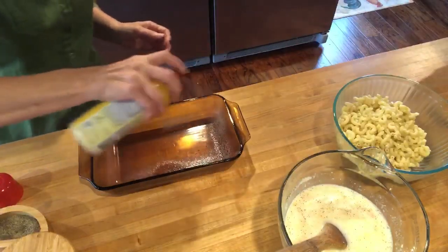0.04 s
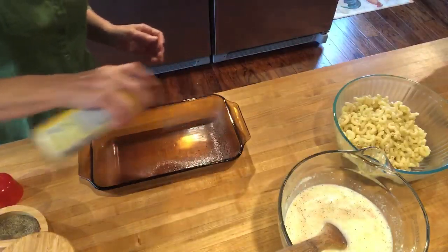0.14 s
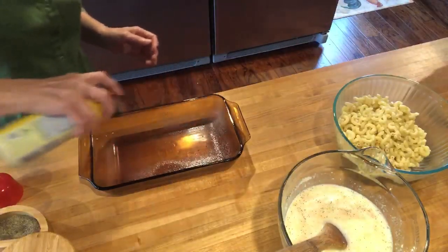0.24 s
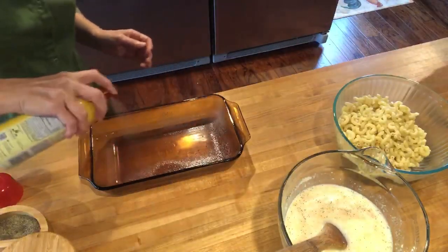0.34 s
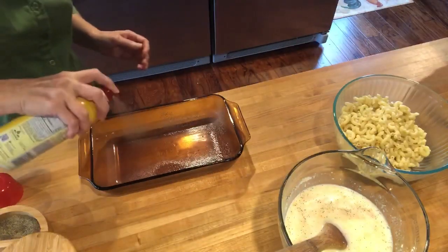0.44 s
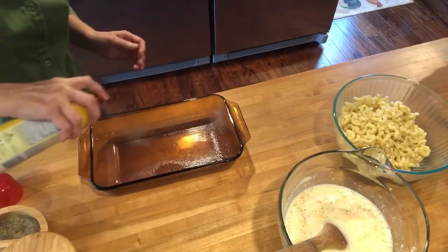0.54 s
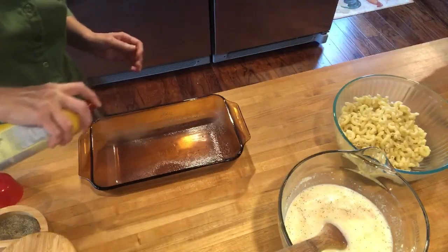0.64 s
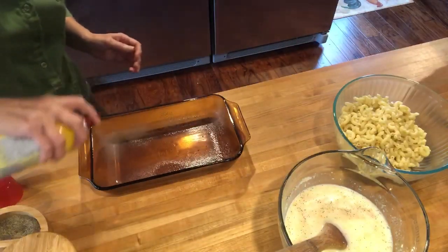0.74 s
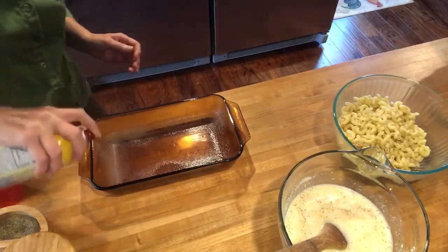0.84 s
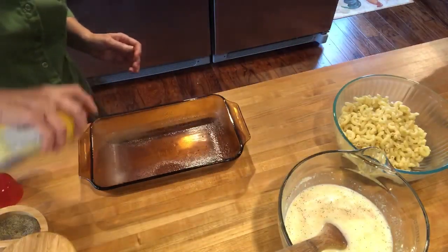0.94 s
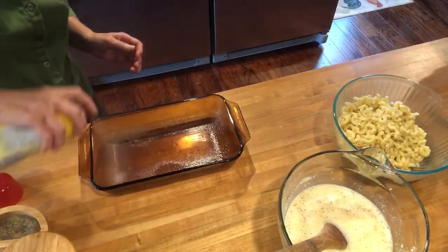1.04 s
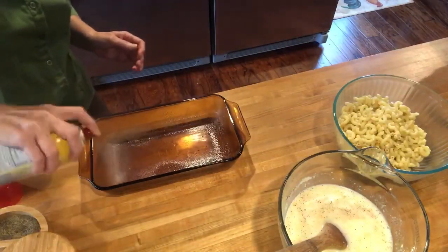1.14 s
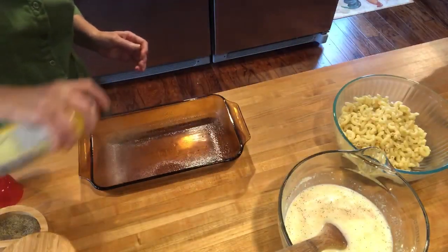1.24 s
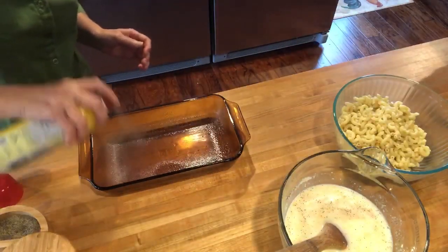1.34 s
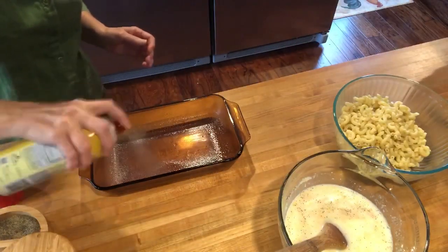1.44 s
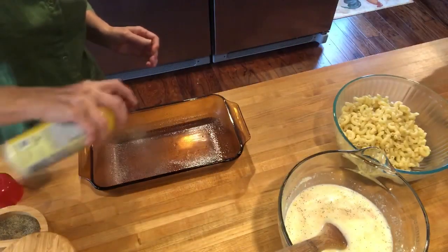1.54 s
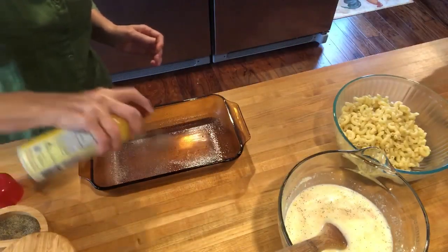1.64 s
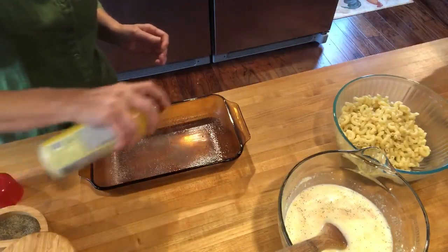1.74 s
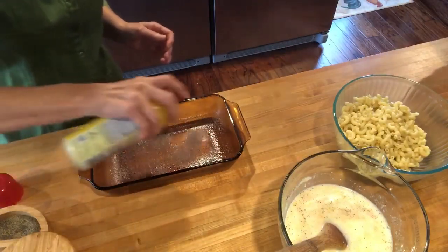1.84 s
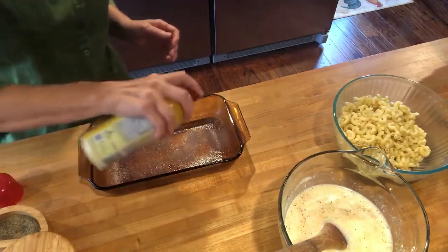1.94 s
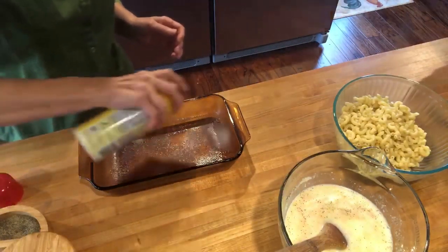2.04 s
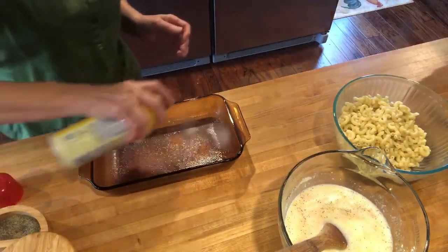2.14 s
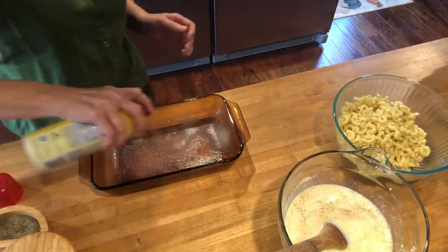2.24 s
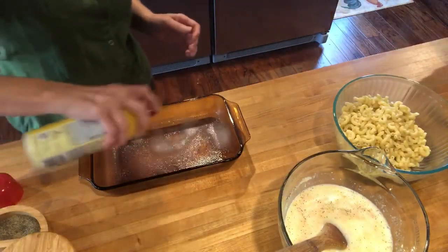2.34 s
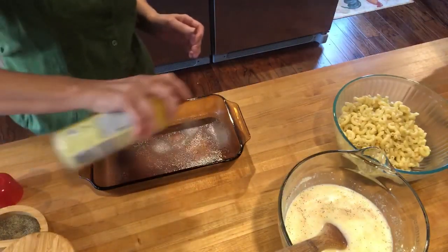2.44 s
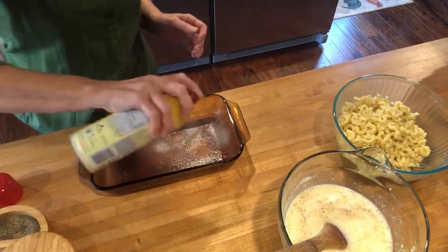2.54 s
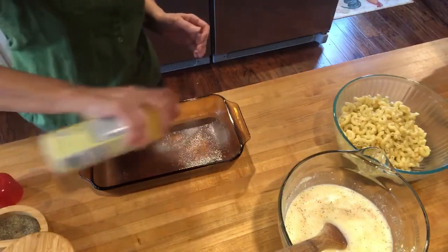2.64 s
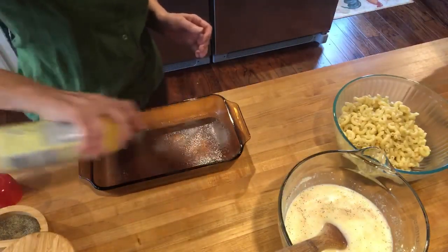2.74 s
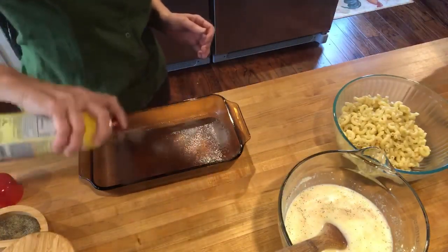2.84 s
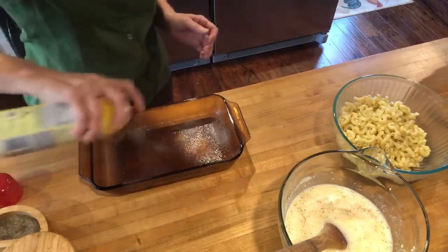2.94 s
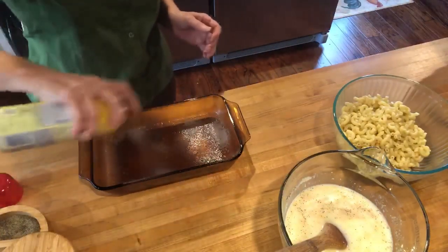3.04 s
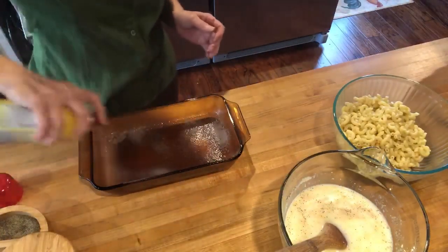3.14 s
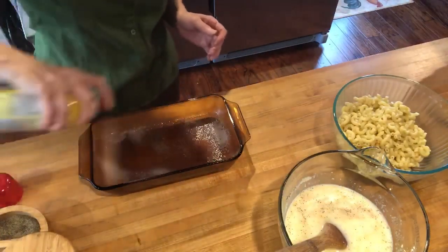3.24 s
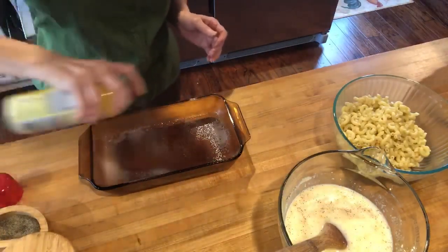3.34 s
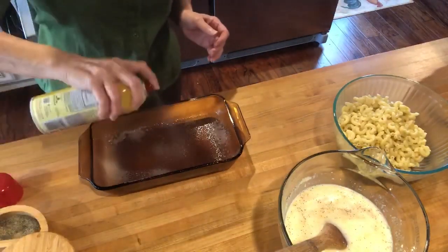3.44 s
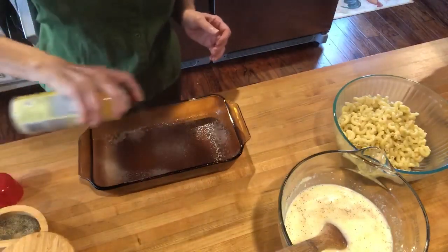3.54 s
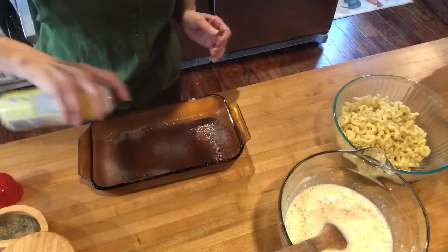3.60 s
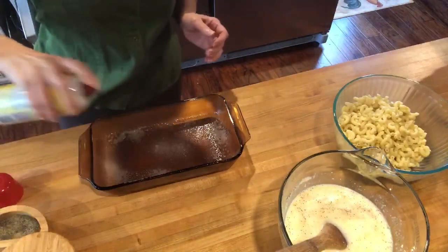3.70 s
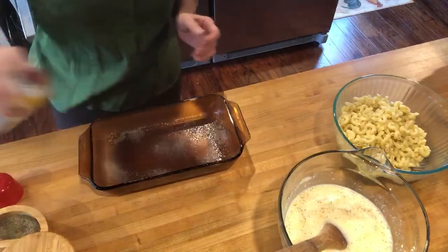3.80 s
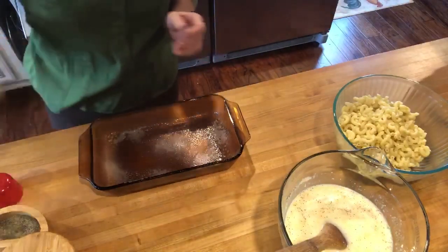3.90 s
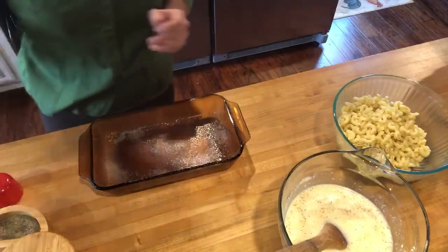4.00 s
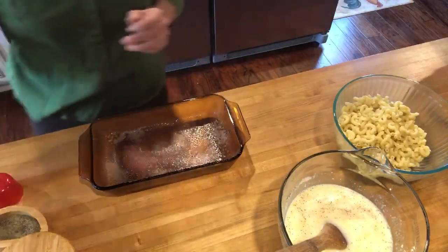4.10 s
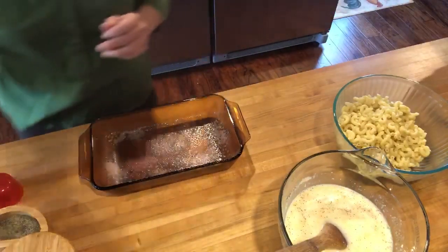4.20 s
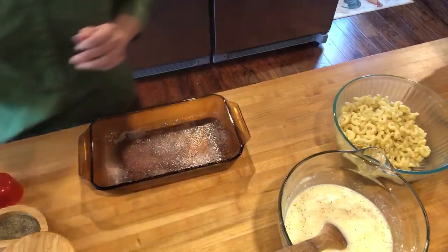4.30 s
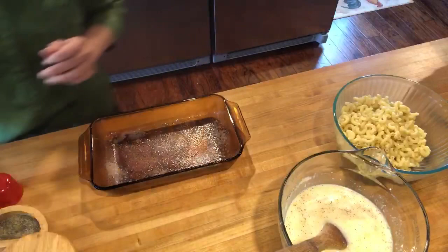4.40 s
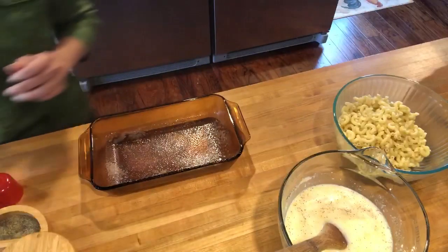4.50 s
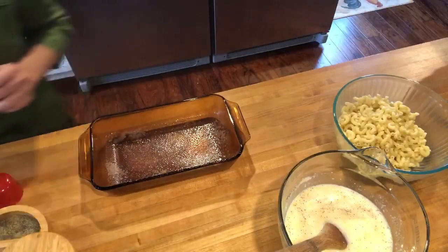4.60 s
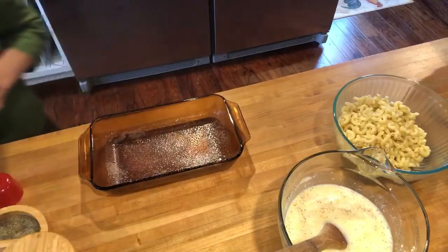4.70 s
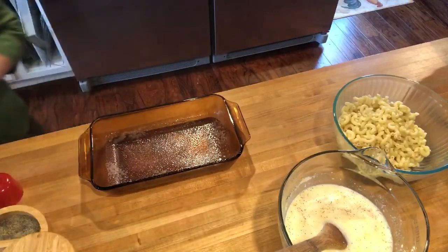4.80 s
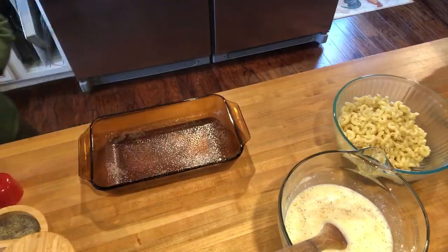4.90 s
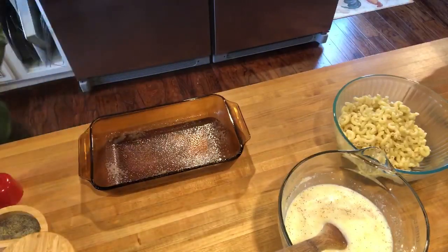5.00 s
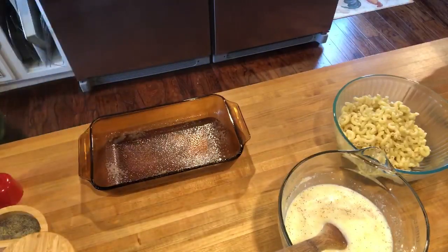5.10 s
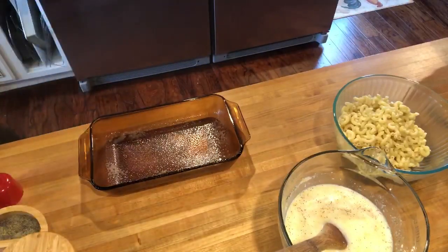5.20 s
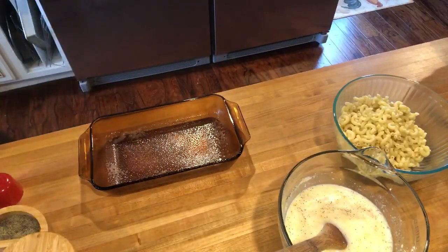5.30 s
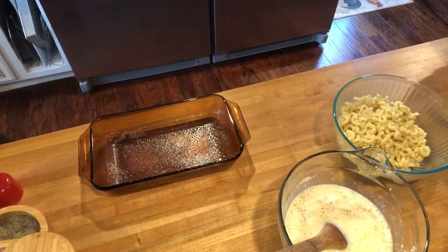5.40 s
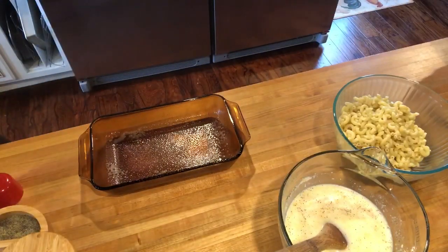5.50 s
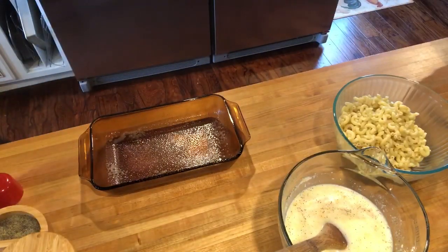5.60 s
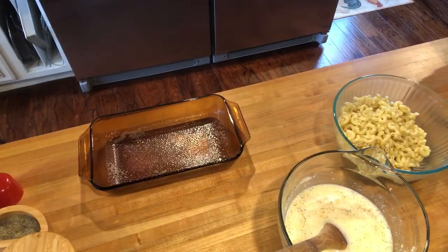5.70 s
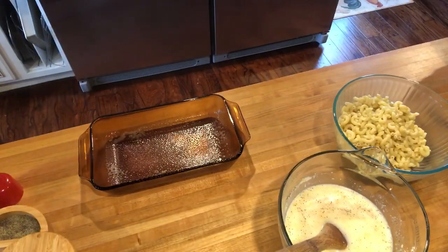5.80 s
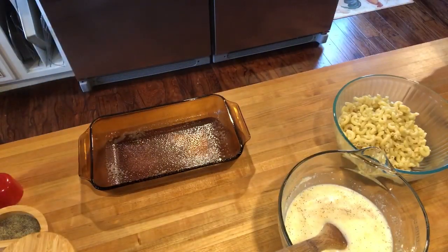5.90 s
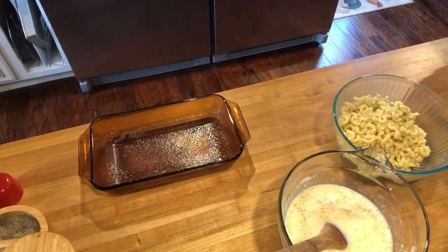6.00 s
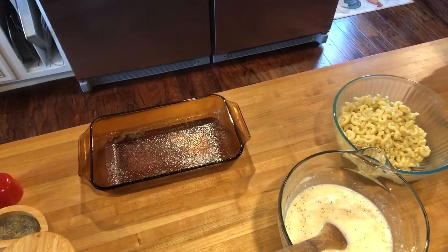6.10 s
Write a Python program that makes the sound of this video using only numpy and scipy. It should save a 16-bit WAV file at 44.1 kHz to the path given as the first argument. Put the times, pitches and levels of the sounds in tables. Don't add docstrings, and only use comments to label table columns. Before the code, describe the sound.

A close, bright aerosol hiss sweeps over a glass dish, snaps off, then a can knocks down on a wooden counter as a refrigerator hums.

```python
import sys
import numpy as np
from scipy import signal
from scipy.io import wavfile
from scipy.ndimage import uniform_filter1d, map_coordinates

SR = 44100
rng = np.random.default_rng(int(sys.argv[2]) if len(sys.argv) > 2 else 0)


def wav_out(sig):
    wavfile.write(sys.argv[1], SR, np.round(np.clip(np.atleast_2d(sig).T, -1, 1) * 32767).astype(np.int16))


def field_ratio(decibels):
    return 10 ** (np.asarray(decibels, dtype=float) / 20)


N = 271215

# t/s, level/dB, nearness to the glass/dB
JET = [(0.0, -40, -2.5), (0.1, -38.5, 0), (0.28, -37.5, -1), (0.55, -38, -0.8), (0.95, -39.5, 0),
       (1.18, -40.5, 0), (1.26, -37.5, 0.5), (1.4, -39.2, 1), (1.72, -39, 1.5), (1.87, -40, -1.2),
       (2.05, -38, -0.2), (2.2, -39, 3), (2.4, -40.5, 2), (2.54, -38, -2), (2.8, -37.5, 2.1),
       (3.12, -38, -1), (3.35, -39.5, 2.7), (3.53, -39.5, 1.2)]
# f/Hz, density/dB
JET_COLOUR = [(300, -25.5), (550, -20.5), (1000, -7.5), (1700, -6.5), (2600, -6.5), (3700, 1), (5500, 1),
              (7000, 1), (8800, 0.5), (12000, -0.5), (16000, 0.5)]
# t/s, extra path by the dish wall/cm, share/1, by the dish floor/cm, share/1
SWEEP = [(0.0, 7.3, .1, 25, .1), (0.22, 9.1, .16, 17.3, .3), (0.36, 8.2, .14, 19.8, .3),
         (0.5, 8.6, .18, 20.2, .22), (0.6, 9.0, .24, 20.2, .12), (0.95, 9.3, .26, 18.4, .14),
         (1.22, 9.6, .2, 21.5, .15), (1.45, 10.4, .13, 22, .16), (1.53, 9, .1, 14.6, .16),
         (1.9, 10, .12, 16.5, .05), (2.04, 9, .08, 12.5, .2), (2.14, 9, .05, 15.5, .26),
         (2.26, 8.8, .06, 14.4, .18), (2.5, 8.8, .32, 26, .22), (2.71, 10.5, .2, 20.9, .32),
         (2.91, 10.6, .14, 25.5, .27), (3.12, 9, .16, 20.3, .2), (3.53, 8.9, .1, 20, .12)]
# t/s, level/dB
GULPS = [(0.0, -3), (0.85, -1), (0.92, -1.5), (1.2, -4), (1.9, 3.5), (1.95, -4), (1.972, 3), (2.0, -2),
         (2.03, -1), (3.38, -2.5), (3.42, 3), (3.478, 3), (3.528, 2)]
# f/Hz, level/dB
RUMBLE = [(26, -55), (45, -27), (60, -8), (105, -11), (150, -6.5), (215, -8.5), (245, -10.5), (300, -6.5),
          (476, -12.5), (672, -19.5), (1100, -23.5), (1930, -34.5), (4800, -40.5), (7600, -44), (8600, -49),
          (14500, -55), (16000, -58)]
# f/Hz, peak level/dB
HUM = [(120.04, -55), (116.98, -65), (118.4, -74)]
# f/Hz, level/dB, width/Hz, wavering share/1
MOTOR_TONES = [(287, -63, 24, 3.1), (405, -69, 24, 3.1), (1812, -84, 14, 1.2), (3042, -89, 10, 1.2),
               (4269, -89, 8, .8), (4328, -91, 8, .8), (4740, -78.5, 25, .35), (4796, -89, 8, .8)]
# t/s, peak level/dB, f/Hz
TICKS = [(3.638, -73, 2400), (3.801, -57, 1700), (4.649, -51, 2600), (4.65, -62, 6500), (3.72, -58, 13500),
         (3.757, -49, 5000), (3.757, -56, 2100), (3.77, -59, 14000), (3.794, -54, 2180), (3.798, -57, 9500),
         (3.805, -55, 4500), (3.82, -62, 12500), (3.82, -61, 7300), (3.845, -60, 7300), (3.925, -65, 11000),
         (3.95, -58, 13500), (3.968, -51, 6300), (3.968, -50, 1980), (3.984, -50.5, 2270),
         (4.01, -66, 12500), (4.1, -62, 6000)]
# loudest t/s, rise/s, fall/s, level/dB, thin top re level/dB
RUSTLE = [(3.804, .06, 0.056, -59, -13), (3.976, .1, .09, -59.5, -15), (4.1, .015, .02, -73, -20),
          (4.655, .01, 0.17, -60, -21), (4.75, 0.065, .5, -60, -9.5), (4.862, .14, 0.12, -58.5, -10),
          (4.915, .15, 0.034, -66, -10), (5.105, 0.069, .08, -73, 2), (5.288, 0.12, .02, -67, -20),
          (5.36, .05, .5, -63, -24), (5.47, 0.28, .3, -67, -8), (5.84, 0.76, .08, -68, -9)]
# f/Hz, level/dB
CLOTH_COLOUR = [(800, -4), (2500, -3.5), (5000, -3.5), (8000, -11.0), (16000, -17)]
# t/s, peak level/dB, tick hardness/dB, dullness/(dB per octave)
KNOCKS = [
    (4.373, -46, -40, 0),
    (4.3836, -22.5, -10.5, -2.5),
    (4.388, -21.5, -30, 1),
    (4.397, -22, -40, 5),
    (4.411, -34, -30, -1),
    (4.428, -37, -14, -3),
    (4.512, -35, -21, -1.5),
    (4.518, -33, -40, 6),
    (4.529, -34.5, -40, 5),
    (4.648, -52, -1, 0),
]
# f/Hz, level/dB, t60/s
COUNTER = [(175, -23, 0.065), (222, 0, 0.03), (294, 1.5, 0.055), (390, 0.5, 0.044), (509, 13, 0.026),
           (587, 6, 0.043), (660, -4, 0.049), (780, -12, 0.047), (842, 9, 0.031), (1000, 1, 0.045),
           (1165, -7, 0.054), (1280, -13.5, 0.12), (1634, -3.5, 0.02), (2060, -12, 0.022),
           (2380, -18, 0.023), (2670, -43, 0.013)]
# f/Hz, t60/s
KITCHEN = [(150, 0.26), (500, 0.49), (2000, 0.62), (6000, 0.52), (14000, 0.32)]

SHUT_S = 3.543
CAN_WALL_HZ = 2355


def evened(x):
    return x / np.sqrt(np.mean(x ** 2) + 1e-20)


def read(points, hz):
    f, value = np.transpose(points)
    return np.interp(np.log(hz + 1), np.log(f + 1), value)


def columns(rows, t):
    s, *values = np.transpose(rows)
    return [np.interp(t, s, v) for v in values]


def grid(size):
    t = np.arange(4 * N // size + 5)[:, None] * size / 4 / SR
    return t, np.fft.rfftfreq(size, 1 / SR)


def noise(magnitude):
    a, b = rng.standard_normal((2,) + magnitude.shape)
    size = 2 * (magnitude.shape[1] - 1)
    return signal.istft(((a + 1j * b) * magnitude).T, nperseg=size, noverlap=3 * size // 4)[1][:N]


def unit_power(magnitude, band):
    power = 8 / 3 * (magnitude ** 2 * band).sum(-1, keepdims=True)
    return 1 / np.sqrt(power + 1e-20)


def patches(shape, frames, bins):
    field = uniform_filter1d(rng.standard_normal(shape), frames, 0)
    return evened(uniform_filter1d(field, bins, 1))


def resonate(x, hz, width):
    r = np.exp(-np.pi * width / SR)
    return 2 * signal.lfilter([1 - r], [1, -r * np.exp(2j * np.pi * hz / SR)], x).real


def strike(s, db):
    x = np.zeros(N)
    x[round(s * SR)] = field_ratio(db)
    return x


def ring(x, hz, t60):
    t = np.arange(round(t60 * SR)) / SR
    return signal.oaconvolve(x, field_ratio(-60 * t / t60) * np.sin(2 * np.pi * hz * t))[:N]


def reflected(t, hz):
    sound_cm_per_s = 34300
    wall_cm, wall, floor_cm, floor = columns(SWEEP, t)
    echoes = [(5.7, 0.8 * wall, 1.0),
              (wall_cm, wall, 1.2),
              (floor_cm, floor, 1.4)]
    paths = 1
    for cm, share, gain in echoes:
        paths = paths + gain * share * np.exp(-2j * np.pi * hz * cm / sound_cm_per_s)
    return np.sqrt(abs(paths) ** 2 + 0.1)


def ripples(t, hz):
    floor_cm = columns(SWEEP, t)[2]
    field = patches((len(t), 2 * len(hz)), 22, 3)
    slid = np.arange(len(hz)) * np.sqrt(uniform_filter1d(floor_cm, 9, 0) / 20.6)
    frame = np.arange(len(t))[:, None]
    return map_coordinates(field, np.broadcast_arrays(frame, slid), order=1)


def spray(patchy_db=3.0, sputter_db=0.5):
    t, hz = grid(size=512)
    middle_db, splash_level_db, gulp_s = -3.5, -50.5, 0.0098
    level_db, near_db = columns(JET, t)
    top_db = 4.5 + 0.9 * (level_db + 40)
    splash_db = splash_level_db + near_db - level_db - middle_db
    shape = field_ratio(read(JET_COLOUR, hz)) * reflected(t, hz)

    low, high = hz < 2900, hz > 8000
    top_share = np.clip((hz - 6000) / 4000, 0, 1)
    splash_share = np.clip((3400 - hz) / 1000, 0, 1)
    middle = unit_power(shape, ~low & ~high)
    top = unit_power(shape, high) * field_ratio(top_db) / middle
    splash = unit_power(shape, low & (hz > 700)) * field_ratio(splash_db) / middle
    shape = shape * middle * top ** top_share * splash ** splash_share
    shape = shape * field_ratio(patchy_db * ripples(t, hz))

    now = np.arange(N) / SR
    sputter = evened(uniform_filter1d(rng.standard_normal(N), 300))
    gulps_db = sum(db * np.exp(-((now - s) / gulp_s) ** 2) for s, db in GULPS)
    flow_db = columns(JET, now)[0] + middle_db + gulps_db + sputter_db * sputter
    closing = np.clip((SHUT_S + .002 - now) / 0.0054, 0, 1)
    jet = noise(shape) * field_ratio(flow_db) * closing
    can_wall = field_ratio(0.5) * resonate(jet, CAN_WALL_HZ, 25)
    return jet + can_wall


def fridge():
    t, hz = grid(size=2048)
    now = np.arange(N) / SR
    in_step_s = .45
    rumble = noise(field_ratio(read(RUMBLE, hz) + 1.2 * patches((len(t), len(hz)), 6, 12)))
    out = field_ratio(-53) * evened(rumble)
    for tone_hz, db in HUM:
        out += field_ratio(db) * np.sin(2 * np.pi * tone_hz * (now - in_step_s))
    for tone_hz, db, width, share in MOTOR_TONES:
        waver = resonate(resonate(rng.standard_normal(N), tone_hz, width), tone_hz, width)
        steady = np.sin(2 * np.pi * (tone_hz * now + rng.random()))
        out += field_ratio(db) * evened(share * evened(waver) + steady)
    return out


def valve():
    click_db, click_hz, click_t60 = -42.5, 1320, 0.012
    after = field_ratio(-10) * ring(strike(SHUT_S, click_db), CAN_WALL_HZ, 0.16)
    return after + ring(strike(SHUT_S, click_db + 6), click_hz, click_t60)


def ticks():
    out, t = np.zeros(N), np.arange(900) / SR
    for s, db, hz in TICKS:
        puff = rng.standard_normal(900) * field_ratio(-60 * t / 0.034) * np.minimum(t / 0.0011, 1)
        width = 0.17 * hz + 300
        burst = resonate(resonate(puff, hz, width), hz, width)
        out += signal.oaconvolve(strike(s, db - 3.0), burst / abs(burst).max())[:N]
    return out


def rustle():
    t, hz = grid(size=256)
    power = np.zeros((len(t), len(hz)))
    shape = field_ratio(read(CLOTH_COLOUR, hz))
    for s, rise, fall, db, top_db in RUSTLE:
        level_db = db - 18.5 * np.maximum((s - t) / rise, (t - s) / fall)
        tilt = field_ratio((top_db + 8.0) * np.clip((hz - 6000) / 4000, 0, 1))
        even = unit_power(shape, (hz > 2500) & (hz < 8000))
        power += (shape * tilt * even * field_ratio(level_db)) ** 2
    return noise(np.sqrt(power) * field_ratio(2.0 * patches(power.shape, 4, 20)))


def cap():
    return ring(strike(3.797, -56), hz=1690, t60=.18)


def knocks():
    out, t = np.zeros(N), np.arange(900) / SR
    for s, db, tick_db, dull_db in KNOCKS:
        spread = rng.uniform(-1, 1, (len(COUNTER), 2)) * (2.5, .03)
        body = np.zeros(N)
        for (hz, mode_db, t60), (extra_db, detune) in zip(COUNTER, spread):
            push_db = db + mode_db + extra_db - dull_db * np.log2(hz / 500)
            body += ring(strike(s, push_db), hz * (1 + detune), t60)
        rise = np.clip((np.arange(N) / SR - s) / 0.0029, 0, 1)
        puff = rng.standard_normal(900) * field_ratio(-60 * t / .014)
        crack = resonate(resonate(resonate(puff, 1800, 3000), 1600, 5000), 2500, 7800)
        out += body * rise + signal.oaconvolve(strike(s, db + tick_db), crack)[:N]
    return signal.sosfilt(signal.butter(2, 120, "high", fs=SR, output="sos"), out)


def kitchen(x, gap=150):
    taps = np.zeros(SR)
    at = np.arange(gap, SR - 20, 20)
    taps[at + rng.integers(0, 20, len(at))] = rng.choice([-1., 1.], len(at))
    hz, t, z = signal.stft(taps, SR, nperseg=256)
    decay = field_ratio(-60 * t / read(KITCHEN, hz)[:, None])
    tail = signal.istft(z * decay, SR, nperseg=256)[1]
    return signal.fftconvolve(x, tail / np.linalg.norm(tail))[:N]


def scene():
    jet = spray() + valve()
    background = fridge()
    small = ticks()
    cloth = rustle()
    can = knocks()
    wet = kitchen(field_ratio(-6) * jet + field_ratio(-7) * can + field_ratio(-6) * small)
    mono = field_ratio(3.5) * jet + can + small + cap() + wet + cloth + background
    return np.array([mono, mono])


def low_pass(x):
    return signal.sosfilt(signal.butter(12, 16210, fs=SR, output="sos"), x)


def record(dry):
    heard = signal.sosfilt(signal.butter(4, 52, "high", fs=SR, output="sos"), dry)
    edge = signal.firwin(1023, 15760, window=("kaiser", 9), fs=SR)
    return low_pass(signal.oaconvolve(heard, edge[None], "same"))


dry = scene()
out = record(dry)
wav_out(out)
```